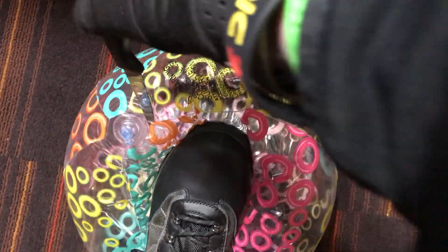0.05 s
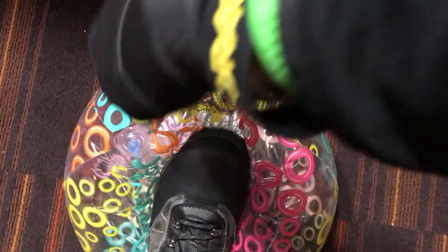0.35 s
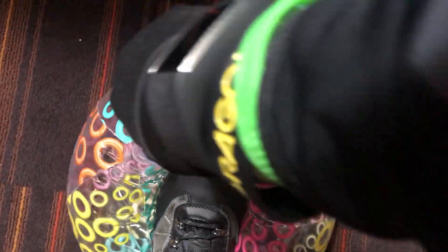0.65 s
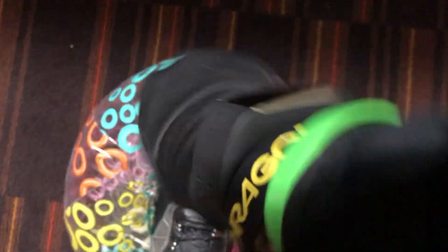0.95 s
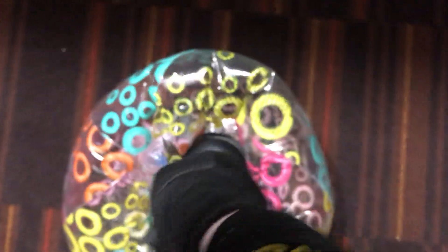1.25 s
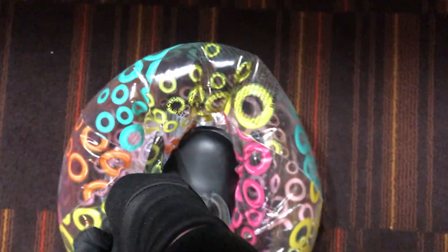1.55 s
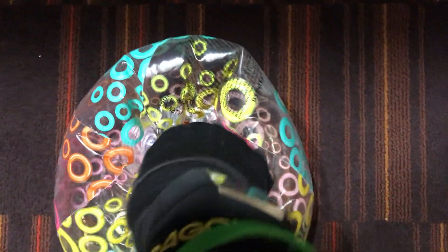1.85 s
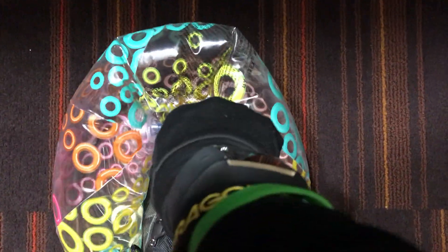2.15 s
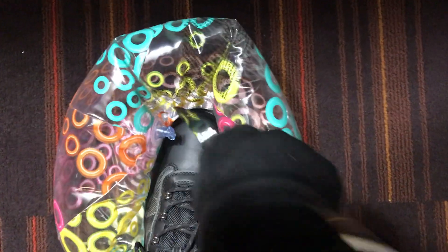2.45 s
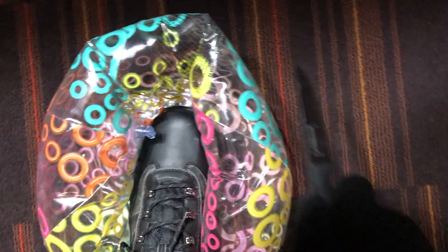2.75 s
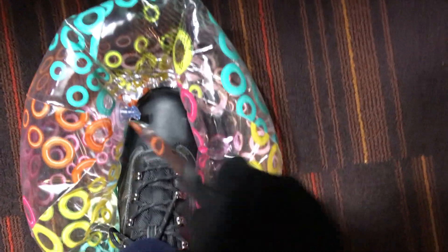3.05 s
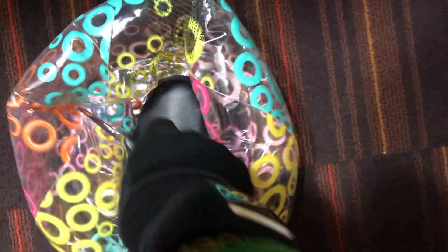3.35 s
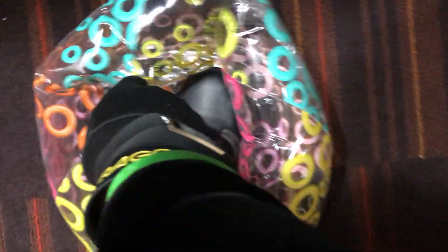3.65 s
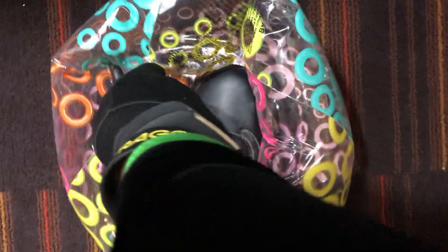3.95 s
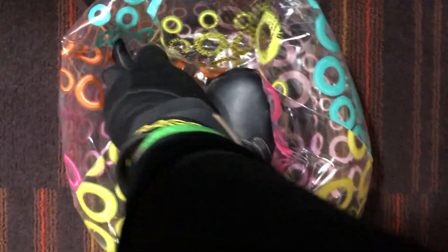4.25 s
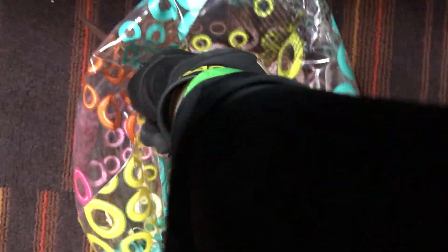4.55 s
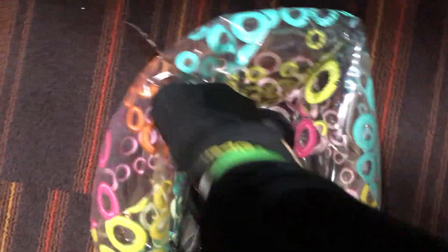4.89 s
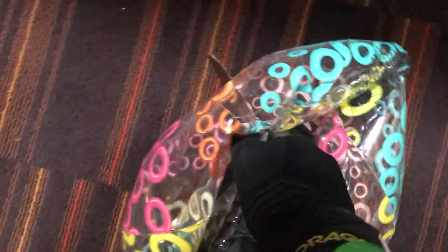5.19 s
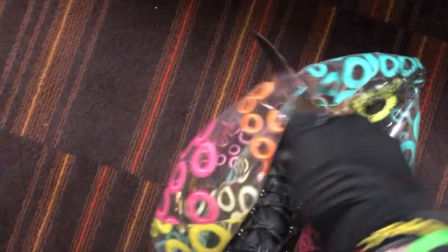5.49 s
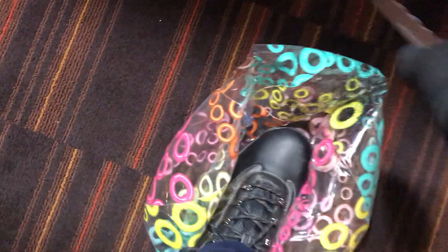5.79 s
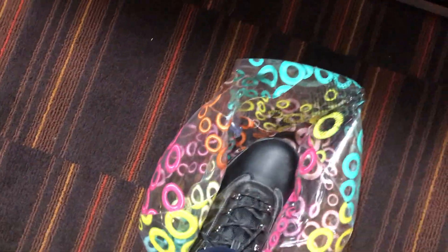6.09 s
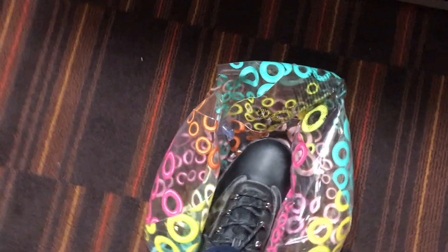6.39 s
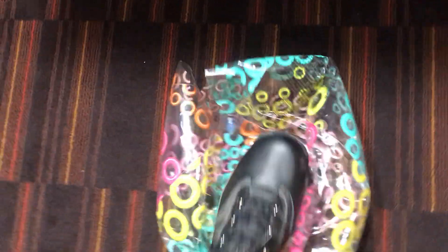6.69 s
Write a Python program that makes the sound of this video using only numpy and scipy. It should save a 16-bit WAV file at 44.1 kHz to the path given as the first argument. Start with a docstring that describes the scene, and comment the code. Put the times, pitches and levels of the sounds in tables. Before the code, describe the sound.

From the start, air hisses out of a punctured vinyl inflatable, breathy and slightly fluttering, with faint airy whistles. A gloved hand squeezes it, making a few creaking ticks between 0.6 and 0.9 seconds. A second squeeze swells the hiss at about 2.1 seconds; from 2.4 seconds the skin goes slack with small pops and the hiss dies away. Between 3.3 and 4.1 seconds the hand lands several soft, hollow thumps on the air chamber, while the vinyl rustles and buckles in scattered pops that continue past 5 seconds. At about 5.45 and 5.6 seconds a knife punches and rips through the plastic in two short, sharp strokes, the loudest sounds. From 6.4 seconds the limp vinyl rustles and pops under a shoe. Ventilation rumbles quietly throughout in the small, dry room, all heard through one close microphone.

```python
"""A punctured vinyl inflatable, pinned to the carpet by a shoe, hisses out its air from the start.
A gloved hand squeezes it, creaking, and then squeezes again. From 2.4 s the skin is slack: the hiss
dies away, the vinyl buckles in small pops and rustles, and the hand thumps the soft air chamber.
Near 5.5 s a knife rips through it twice. Last, the limp vinyl rustles and pops under the shoe.
All along, ventilation rumbles in the small, dry room, heard through one close microphone."""
import sys
import numpy as np
from scipy import signal
from scipy.fft import rfft, irfft, next_fast_len
from scipy.io import wavfile
from scipy.ndimage import uniform_filter1d, map_coordinates

SR = 44100
rng = np.random.default_rng(int(sys.argv[2]) if len(sys.argv) > 2 else 0)


def to_wav(s):
    """Save 16-bit WAV."""
    ch = np.atleast_2d(s).T  # columns
    pcm = np.round(np.clip(ch, -1, 1) * 32767)  # PCM
    wavfile.write(sys.argv[1], SR, pcm.astype(np.int16))


N = 305613
TIME = np.arange(N) / SR
SHORT = TIME[:SR // 4]  # a quarter-second clock for brief sounds

# the body of the hiss and its bright fizz: (frequency [Hz], level [dB])
RUSH_SPECTRUM = [(200, -21), (650, -5), (1050, -0.5), (2250, -2), (4000, -0.5), (5000, -6.5), (7200, -15.5),
                 (10000, -36)]
FIZZ_SPECTRUM = [(4000, -10), (7500, -6.5), (9600, -6), (13500, -5), (15700, -5)]
# the detour the hiss takes by way of a cloth sleeve: (time [s], extra path [m])
SLEEVE_PATH = [(.4, 0.34), (.6, 0.31), (1.9, 0.295), (2.2, 0.29)]
def leak(rush_db=-51.5, fizz_db=-50, sleeve_echo=0.33, sleeve_dull_hz=7500):
    """The air jet hisses, brighter with more flow; a dull echo off the moving sleeve hollows it."""
    flow_db = air_flow()
    aim_db = 7.5 * bump(0.29, 0.64)  # early on, the jet beams its treble at the microphone
    jet = amp(rush_db + flow_db) * noise(RUSH_SPECTRUM)
    jet += amp(fizz_db + 1.2 * flow_db + aim_db) * noise(FIZZ_SPECTRUM)
    delay_s = np.interp(TIME, *np.transpose(SLEEVE_PATH)) / 343
    echo = map_coordinates(jet, [(TIME - delay_s) * SR])
    echo = filtered(echo, lambda hz: 1 / np.hypot(1, hz / sleeve_dull_hz))
    hiss = drifting(jet + sleeve_echo * echo + slit_whistles())
    return hiss * amp(0.77 * wobble(24.97))  # the level flutters


# the hand squeezes out more air: (start [s], rise [s], hold [s], release [s], boost [dB])
HAND_SQUEEZES = [(0.435, 0.37, 0.11, 0.09, 2), (2.103, 0.1, 0.41, 0.063, 4)]
def air_flow(sag_db_per_s=2.5, slack_s=2.364, drain_db_per_s=18):
    """Flow in dB: it sinks with the pressure, rises with each squeeze and dies once the skin is slack."""
    squeezed = sum(db * swell(*timing) for *timing, db in HAND_SQUEEZES)
    return squeezed - sag_db_per_s * TIME - drain_db_per_s * np.maximum(TIME - slack_s, 0)


# the slit's breathy notes:
# (loudest time [s], half length [s], pitch [Hz], glide [Hz/s], width [Hz], level [dB])
WHISTLES = [(0.331, 0.15, 13400, -1500, 2480, -47.5), (0.623, 0.12, 7200, 2009, 400, -57),
            (0.802, 0.21, 2269, 100, 445, -49.5), (0.878, 0.251, 4004, 0.5, 2100, -47.5),
            (.93, 0.22, 5880, 1301, 470, -46), (1.45, .45, 5890, 301, 645, -58.5),
            (2.27, .2, 3210, 301, 1400, -54), (2.27, .16, 14800, 0, 1620, -62),
            (2.632, 0.13, 5180, -2800, 240, -62), (2.72, 0.21, 4010, -2400, 300, -67),
            (3.055, .03, 7650, -10000, 70, -77), (3.636, .16, 4580, 96, 120, -68)]
def slit_whistles():
    """Swirling air makes the slit whistle; the notes glide as it changes shape."""
    out = np.zeros(N)
    for s, half_length, hz, glide, width_hz, db in WHISTLES:
        envelope = bump(s, half_length)
        live = envelope > .001
        pole = np.exp(-2 * np.pi * width_hz / SR)
        # two slow noises, shifted up to the pitch, make one narrow band of hiss
        a, b = signal.sosfilt([[1, 0, 0, 1, -pole, 0.003]] * 2, rng.standard_normal((2, N))[:, live])
        phase = 2 * np.pi * np.cumsum(hz + glide * (TIME[live] - s)) / SR
        out[live] += amp(db) * envelope[live] * (unit(a) * np.cos(phase) + unit(b) * np.sin(phase))
    return out


def drifting(hiss, depth_db=0.73):
    """The tone of the hiss drifts at random as the slit and the hand move."""
    bands = signal.stft(hiss, nperseg=512)[2]
    patches = uniform_filter1d(rng.standard_normal(bands.shape), size=7, axis=0)  # smooth over pitch
    patches = uniform_filter1d(patches, size=90, axis=1)  # and over time
    return signal.istft(bands * amp(-depth_db * unit(patches)), nperseg=512)[1][:N]


# the blade punches through: (time [s], level [dB], pitch [Hz])
KNIFE_PUNCHES = [(5.4409, -18, 900), (5.468, -5.5, 2430), (5.4695, -12.5, 512), (5.477, -16.5, 1900),
                 (5.6287, -20, 570)]
# a tear is dull going in and bright coming out: (frequency [Hz], level [dB])
TEAR_IN_SPECTRUM = [(150, -26.5), (250, 0.5), (680, 0), (1050, -6), (1780, -12.5), (2150, -9.5),
                    (4000, -17), (6400, -25), (15500, -31.5)]
TEAR_OUT_SPECTRUM = [(150, -28), (250, -7), (1550, -9.5), (1790, -13), (2020, -1), (2320, -18), (2620, 0),
                     (3010, -17.5), (3710, -4.5), (5350, -28), (5830, -10), (6250, -17), (13700, -22),
                     (16000, -18)]
# the blade tears: (time [s], level [dB], length [s], treble in the room [dB], direction [in/out])
KNIFE_RIPS = [(5.435, -38.5, 0.0031, 0.5, "in"), (5.441, -24, 0.0011, 4.5, "in"),
              (5.4661, -17, 0.012, 0, "in"), (5.625, -15, 0.0043, 13, "out")]
def knife(ring_db=-12):
    """The blade snaps through the skin, rips it and sets the air chamber ringing."""
    out = np.zeros(N)
    for s, db, hz in KNIFE_PUNCHES:
        snap = flex(hz, cycles=2.3, sag=0.28)
        add(out, s, amp(db) * (snap + room(snap, wet_db=-17)))
    for s, db, length, treble_db, direction in KNIFE_RIPS:
        spectrum = TEAR_IN_SPECTRUM if direction == "in" else TEAR_OUT_SPECTRUM
        tear = scrape(spectrum, length, treble_db=0, release=0.002, grit_db=2)
        # the room is fed from every side of the skin, so its tone is smoother
        click = np.linalg.norm(tear) * (SHORT == 0)
        tail = coloured(room(click, wet_db=-13), TEAR_IN_SPECTRUM, treble_db)
        add(out, s, amp(db) * (tear + tail + amp(ring_db) * chamber(SHARP_REACH_HZ)))
    return out


# the hand presses and strikes:
# (time [s], level [dB], pitch [Hz], buckle compared with the blow [dB], crack level [dB])
HAND_BLOWS = [(2.385, -39.5, 117, 10, -45.5), (2.461, -41.5, 129, 8.5, -48), (2.539, -38, 151, 11.5, -44.5),
              (3.303, -34.5, 212, -12, -61), (3.32, -38.5, 210, 4.5, -46), (3.45, -29, 198, 4.5, -37),
              (3.467, -21, 146, -3.5, -48), (3.488, -17.5, 145.4, -4.5, -36), (3.5, -25, 114, 4, -35),
              (3.512, -22, 132, -5.5, -41), (3.751, -13.5, 163, -12, -48), (3.79, -31.5, 169, -6.5, -50),
              (4.0984, -21.5, 132, -0.5, -43), (5.074, -38.5, 307, -5, -62)]
def thumps(ring_db=-8.5, recoil_db=-3, recoil_hz=160):
    """The soft air chamber bounces under each blow and springs back just after each rip."""
    out = np.zeros(N)
    for s, db, hz, *_ in HAND_BLOWS:
        bounce = flex(hz, cycles=1.01, sag=0.29, rise=0.33)
        add(out, s + 0.0016, amp(db) * (bounce + amp(ring_db) * chamber(SOFT_REACH_HZ)))
    recoil = flex(recoil_hz, cycles=0.76, sag=0.2, rise=0.093)
    for s, db, *_ in KNIFE_RIPS:
        add(out, s + 0.0049, amp(db + recoil_db) * recoil)
    return out


SOFT_REACH_HZ, SHARP_REACH_HZ = 400, 1200  # a soft touch wakes only the low notes, a sharp one all
# the notes of the air chamber: (pitch [Hz], level [dB], time to fade by 60 dB [s])
CHAMBER_NOTES = [(220, -2.5, 0.072), (376.7, -1, 0.092), (530, -7, 0.065), (671, 1.5, 0.12),
                 (890, -4.5, 0.079)]
def chamber(reach_hz, detune=0.025):
    """The inflatable rings, mostly below reach_hz; its notes shift as it is bent out of shape."""
    ring = np.zeros(len(SHORT))
    for hz, db, fade_s in CHAMBER_NOTES:
        shift = np.exp(detune * rng.standard_normal())
        envelope = amp(db - 60 * SHORT / fade_s) / (1 + (hz / reach_hz) ** 4)
        ring += envelope * np.sin(2 * np.pi * hz * shift * SHORT)
    return ring * -np.expm1(-SHORT / 0.0011)


# the crack that starts a pop: (frequency [Hz], level [dB])
CRACK_SPECTRUM = [(700, -3), (2000, 5), (3300, 2.5), (5500, -9.5), (10000, -25), (16000, -14.5)]
# the slack skin buckles: (time [s], level [dB], pitch [Hz], crack level [dB])
BUCKLES = [(3.1165, -51, 1270, -53.5), (3.237, -51, 1100, -50), (3.2611, -29.5, 810, -68),
           (3.338, -42, 840, -66), (3.385, -34.5, 1090, -46), (3.7352, -36, 1520, -32.5),
           (3.948, -35.5, 654, -71), (3.97, -44, 924, -74), (4.058, -32.5, 920, -69),
           (4.068, -40, 1040, -60), (4.172, -35, 1280, -45.5), (4.216, -36, 1030, -49.5),
           (4.255, -38, 920, -60), (4.4744, -31.5, 1400, -52), (4.79, -42.5, 1300, -77),
           (4.899, -38.5, 920, -50.5), (4.987, -42, 950, -76), (5.041, -45, 1890, -48),
           (5.074, -27.5, 1500, -51.5), (5.224, -41, 928, -65), (5.312, -43, 1690, -54),
           (6.665, -41.5, 2020, -46.5), (6.746, -41, 900, -47), (6.767, -29, 1080, -37),
           (6.798, -61, 1340, -45)]
def pops(blow_pop_hz=835, crack_fade_s=0.0017, ring_db=-23.5, seam_db=-7, seam_delay_s=0.0029):
    """Each buckle, alone or under a blow, is a tiny crack, a quick bend of the skin and a faint ring."""
    out = np.zeros(N)
    under_blows = [(s, db + buckle_db, blow_pop_hz, crack_db)
                   for s, db, _, buckle_db, crack_db in HAND_BLOWS]
    buckles = list(BUCKLES) + under_blows
    for (s, db, hz, crack_db), distance in zip(buckles, rng.random(len(buckles))):
        crack = amp(crack_db + 5) * noise(CRACK_SPECTRUM, len(SHORT)) * np.exp(-SHORT / crack_fade_s)
        bend = amp(db + 1) * flex(hz, cycles=1.4, sag=0.51)
        ring = amp(db + ring_db) * chamber(SHARP_REACH_HZ)
        add(out, s + .0005, bend + crack + ring)
        # the bend returns from a seam, nearer or farther each time, and hollows the tone
        add(out, s + seam_delay_s * (.5 + distance), -amp(seam_db) * bend)
    return out


def flex(hz, cycles, sag, rise=0.42):
    """A blip of falling pitch: short bending waves cross the skin faster than long ones."""
    turns = (1 + sag / 2) * np.log1p(sag * hz * SHORT) / sag
    attack = -np.expm1(-(turns / rise) ** 2)
    decay = np.exp(-turns / cycles - SHORT * hz / 20)
    wave = np.sin(2 * np.pi * turns) * attack * decay
    return wave / np.abs(wave).max()


def scrape(spectrum, length, treble_db, release, grit_db):
    """Vinyl catches and lets go in a gritty run of tiny ticks that holds, then dies."""
    roughness = unit(uniform_filter1d(rng.standard_normal(len(SHORT)), size=12))
    grit = unit(amp(grit_db * roughness))
    envelope = -np.expm1(-SHORT / 0.000081) * np.exp(-np.maximum(SHORT - length, 0) / release)
    return noise(spectrum, len(SHORT), treble_db) * grit * envelope


# the tone of rubbed vinyl: (frequency [Hz], level [dB])
RUB_SPECTRUM = [(120, 2), (300, 1.5), (900, -0.5), (1700, -8), (3800, -7), (5500, -16), (10000, -26.5),
                (16000, -21.5)]
# short slips of the vinyl: (time [s], level [dB], length [s], treble [dB])
VINYL_SLIPS = [(2.427, -42.5, 0.03, -1), (3.447, -38.5, 0.033, -31), (3.737, -33, 0.014, -24),
               (4.104, -40, 0.016, -22), (4.691, -39, 0.0074, -14), (4.881, -38.5, 0.0063, -45),
               (6.526, -45.5, 0.0092, 14.5), (6.612, -46.5, 0.021, 15)]
def rustle(rub, swish, ring_db=-18):
    """Slack vinyl slides unevenly, rings the chamber faintly and now and then slips."""
    grip = wobble(140)
    dull = rub * amp(1.5 * grip + 2.5 * wobble(22)) * noise(RUB_SPECTRUM)
    ring = chamber(SOFT_REACH_HZ)
    out = dull + amp(ring_db) * signal.fftconvolve(dull, ring / np.linalg.norm(ring))[:N]
    out += swish * amp(2.6 * grip) * noise(FIZZ_SPECTRUM)
    for s, db, length, treble_db in VINYL_SLIPS:
        add(out, s, amp(db) * scrape(RUB_SPECTRUM, length, treble_db, release=0.0043, grit_db=3.5))
    return out


# the skin slides on glove, shoe and carpet: (start [s], length [s], rub [dB], swish [dB])
SLIDES = [(3.29, 0.097, -62, -64.5), (3.495, 0.23, -53, -82), (3.893, 0.38, -59.5, -72),
          (4.313, 1.3, -67, -78.5), (4.823, 0.055, -59.5, -85), (5.163, 0.057, -70.5, -67),
          (6.418, 0.47, -65, -66), (6.559, 0.03, -55.5, -59), (6.65, 0.11, -60.5, -57)]
def sliding(rise_s=0.036, release_s=0.045):
    """How loud the dull rub and bright swish are over time; overlapping slides add in power."""
    power = np.zeros((2, N))
    for s, length, rub_db, swish_db in SLIDES:
        power += (amp([[rub_db], [swish_db]]) * swell(s, rise_s, length - rise_s, release_s)) ** 2
    return np.sqrt(power)


def crinkle(rub, count=85, tick_db=13.5, hz=850):
    """Small creases flip at random, harder when the skin slides faster."""
    out = np.zeros(N)
    times = rng.uniform(SLIDES[0][0], TIME[-1], count)
    for s, (size, pitch) in zip(times, rng.standard_normal((count, 2))):
        gain = np.interp(s, TIME, rub) * amp(tick_db + 2.1 * np.tanh(size))
        add(out, s, gain * flex(hz * np.exp(.35 * pitch), cycles=0.36, sag=0.83))
    return out


# the glove ticks during the first squeeze: (time [s], level [dB])
GLOVE_TICKS = [(.638, -34), (.718, -31.5), (.769, -32.5), (.837, -30.5), (.901, -33)]
def glove_creak(hz=950):
    """The glove sticks and slips on the tight skin."""
    out = np.zeros(N)
    for s, db in GLOVE_TICKS:
        add(out, s, amp(db) * flex(hz, cycles=0.25, sag=0.98))
    return out


# how long the room rings: (frequency [Hz], time to fade by 60 dB [s])
ROOM_FADE = [(120, 0.37), (500, 0.2), (3000, 0.28), (15000, 0.12)]
def room(x, wet_db, build_s=0.0073):
    """The brief echo of the carpeted room, its highest treble dying first."""
    hz, t, bands = signal.stft(rng.standard_normal(len(SHORT)), SR, nperseg=256)
    fade = amp(-60 * t / along(ROOM_FADE, hz)[:, None])
    tail = signal.istft(bands * fade, SR, nperseg=256)[1]
    tail *= -np.expm1(-(TIME[:len(tail)] / build_s) ** 2)
    return amp(wet_db) * signal.fftconvolve(x, tail / np.linalg.norm(tail))[:len(x)]


# the ventilation's rumble and its humming notes: (frequency [Hz], level [dB])
RUMBLE_SPECTRUM = [(20, -37.5), (42, -6.5), (65, -3), (85, -12.5), (250, -17), (500, -31.5), (2500, -42),
                   (10000, -49), (16000, -44.5)]
HUM_NOTES = [(57, -63.5), (119, -64)]
def ventilation(rumble_db=-57):
    """The ventilation rumbles steadily under a wavering hum."""
    hum = np.zeros(N)
    for hz, db in HUM_NOTES:
        gain = np.sqrt(2) * amp(db + 2 * wobble(2.2))
        hum += gain * np.sin(2 * np.pi * hz * TIME + 0.8 * wobble(2.7))
    return amp(rumble_db) * noise(RUMBLE_SPECTRUM) + hum


def amp(db):
    """Turn decibels into a gain."""
    return 10 ** (np.asarray(db) / 20)


def unit(x):
    """Scale to an average power of 1."""
    return x / np.sqrt(np.mean(x ** 2) + 1e-20)


def along(points, hz):
    """Read between (frequency, value) points on a log frequency axis."""
    freqs, values = np.transpose(points)
    return np.interp(np.log(hz + 1), np.log(freqs + 1), values)


def wobble(rate):
    """A smooth curve through rate random values a second."""
    return map_coordinates(rng.standard_normal(int(N * rate / SR) + 4), [TIME * rate])


def swell(start, rise, hold, release):
    """Rise smoothly to 1, hold, then fade."""
    up = np.sin(np.pi / 2 * np.clip((TIME - start) / rise, 0, 1)) ** 2
    return up * np.exp(-np.maximum(TIME - start - rise - hold, 0) / release)


def bump(s, half_length):
    """A bell curve that reaches 1 at s seconds."""
    return np.exp(-np.minimum(((TIME - s) / half_length) ** 2, 20))


def filtered(x, response):
    """Scale each frequency in x by response(hz)."""
    size = next_fast_len(len(x) + 8192)
    return irfft(rfft(x, size) * response(np.fft.rfftfreq(size, 1 / SR)), size)[:len(x)]


def coloured(x, spectrum, treble_db):
    """Give x the tone of a spectrum, with the treble turned up or down."""
    shelf = lambda hz: hz ** 2 / (hz ** 2 + 4500 ** 2)
    return filtered(x, lambda hz: unit(amp(along(spectrum, hz) + treble_db * shelf(hz))))


def noise(spectrum, size=N, treble_db=0):
    """Noise with the given tone and an average power of 1."""
    return unit(coloured(rng.standard_normal(size), spectrum, treble_db))


def add(track, s, sound):
    """Mix a sound in at s seconds."""
    start = round(s * SR)
    track[start:start + len(sound)] += sound[:N - start]


def scene():
    """Mix all the sources, the same in both channels."""
    rub, swish = sliding()
    handling = pops() + glove_creak() + rustle(rub, swish) + crinkle(rub)
    blows = thumps()
    mono = leak() + handling + room(handling, wet_db=-15)
    mono += blows + room(blows, wet_db=-13.5) + knife() + ventilation()
    return np.array([mono, mono])


def record(dry, dip_hz=10500, dip_width_hz=400, dip_db=-3, top_hz=15900):
    """The microphone has a narrow dip in the treble, and the very highest sounds are cut off."""
    def response(hz):
        dip = amp(dip_db * np.exp(-((hz - dip_hz) / dip_width_hz) ** 2))
        return dip / (1 + (hz / top_hz) ** 200)
    return np.array([filtered(side, response) for side in dry])


dry = scene()
out = record(dry)
to_wav(out)
```